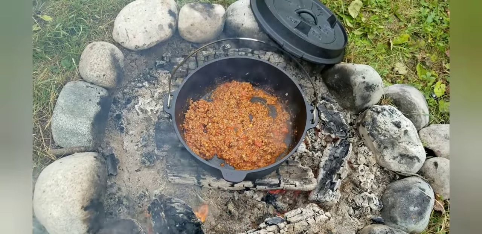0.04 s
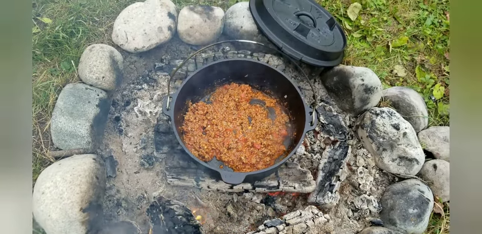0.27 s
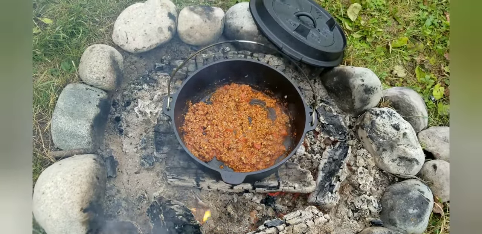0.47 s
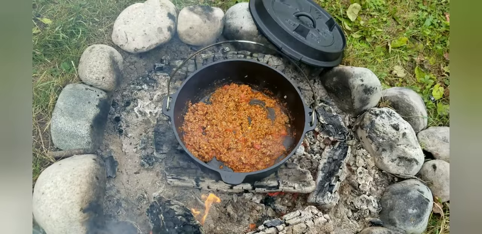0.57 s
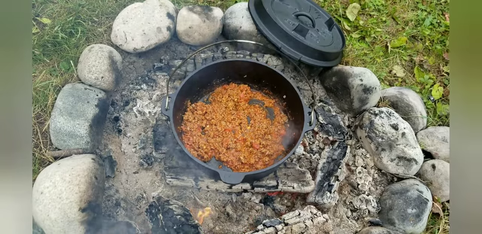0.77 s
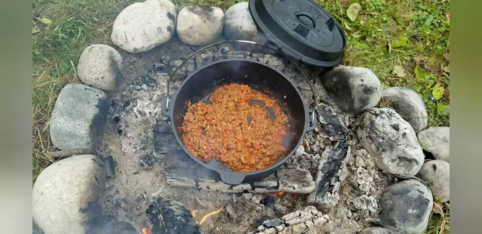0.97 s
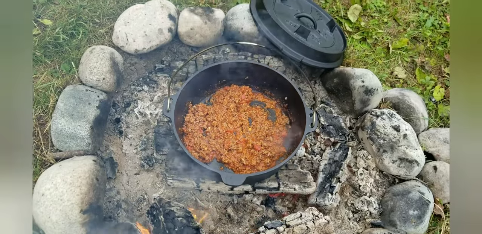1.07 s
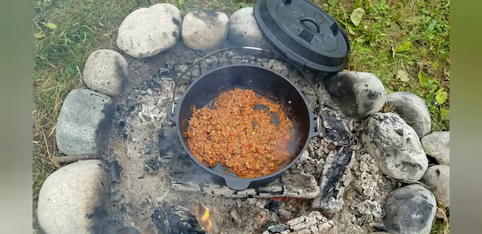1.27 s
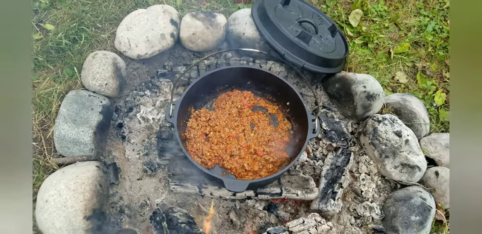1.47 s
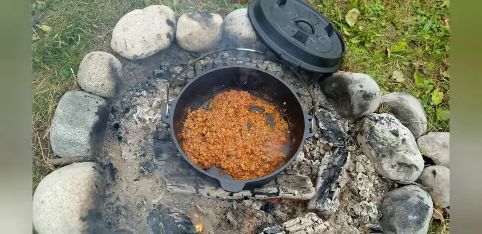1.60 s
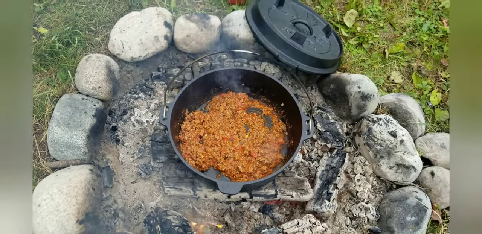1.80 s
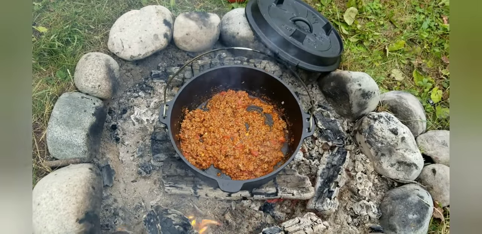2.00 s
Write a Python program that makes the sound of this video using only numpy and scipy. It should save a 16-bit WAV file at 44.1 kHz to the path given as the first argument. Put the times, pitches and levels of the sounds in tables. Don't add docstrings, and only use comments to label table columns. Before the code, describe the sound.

Meat and sauce sizzle in an iron pot, fine spitting grains over steam hiss, slightly to one side. The sizzle swells from 0.2 s, sags around 0.8-1.0 s, returns by 1.3 s and eases near the end. Embers tick from 0.2 s; wood cracks softly at 0.46 s and loudly at 0.75 s. Low flame flutter is strongest before 0.9 s; later ticks are faint, over steady outdoor wash.

```python
import sys
import numpy as np
from scipy import signal
from scipy.fft import rfft, irfft
from scipy.io import wavfile
from scipy.ndimage import uniform_filter1d

SR = 44100
rng = np.random.default_rng(int(sys.argv[2]) if len(sys.argv) > 2 else 0)


def linear_from_db(decibels):
    return 10 ** (np.asarray(decibels, float) / 20)


def inscribe(sig):
    pcm = np.round(np.clip(np.atleast_2d(sig).T, -1, 1) * 32767)
    wavfile.write(sys.argv[1], SR, pcm.astype(np.int16))


N = 90404
HISS_EDGE_HZ = 15800

# f/Hz, density/dB per Hz
WASH_COLOUR = [(300, -39), (490, -17), (545, 1), (860, -10.5), (1080, -4), (2460, -11.5), (3210, -10.5),
               (9200, -14.5), (15700, -14.5)]
# f/Hz, likeness/1
WASH_ALIKE = [(60, 0.83), (240, 0.56), (950, 0.94), (3770, 0.071), (15000, -1.3)]
# t/s, level/dB
FLUTTER_LEVEL = [(0, -58), (.12, -57.5), (.23, -65), (.27, -54), (.6, -55.5), (.72, -62), (.78, -53.5),
                 (.862, -51), (.875, -63.5), (.98, -63), (1.04, -59), (1.14, -62.5), (1.35, -61.5),
                 (1.46, -60.5), (1.56, -62), (1.64, -69), (1.8, -65), (1.93, -59), (2.05, -58)]
# f/Hz, density/dB per Hz
FLUTTER_COLOUR = [(12, -35), (30, -12.5), (74, 0.5), (290, -20.5), (317, -19.5), (400, -23), (480, -25),
                  (600, -55), (920, -120)]
# t/s, peak/dB, centre f/Hz, length/s
PUFFS = [(0.082, -49.5, 210, 0.021), (0.254, -44.5, 93.5, 0.041), (0.301, -42.5, 241, 0.057),
         (0.326, -50.5, 550, 0.047), (0.357, -45.5, 94.2, 0.012), (0.385, -61, 70.0, 0.054),
         (0.482, -41.5, 480, 0.019), (0.291, -47, 1130, 0.03), (1.464, -51, 40, 0.14),
         (1.419, -55, 66, 0.06), (1.778, -52, 68, 0.098), (0.498, -44, 68.6, 0.031),
         (0.534, -43.5, 99, 0.0313), (0.595, -45.5, 73.6, 0.025), (0.763, -41.5, 250, 0.033),
         (0.803, -41.5, 70, 0.036), (0.824, -43, 100, 0.028), (1.007, -49, 112, 0.043),
         (2.027, -51, 74.4, 0.029)]
# t/s, peak/dB, ring f/Hz, dull knock/dB, left-right/dB
TICKS = [(.2274, -35.5, 4060, -64, 6), (.3217, -28, 7300, -42, 6), (.5325, -35.5, 3600, -53, -6),
         (.6374, -27.5, 14800, -62, 2), (.7088, -31, 3700, -46, -4.5), (1.0933, -51, 5200, -60, -2),
         (1.218, -42, 7550, -63, 0), (1.325, -43, 8500, -60, -3), (1.3736, -41, 2700, -52, 1),
         (1.4017, -48, 4620, -56, -7), (1.4621, -37, 5200, -51, 4), (1.906, -42.5, 3150, -43.5, -3),
         (1.9945, -42.5, 2620, -41, -6)]
# t/s, peak/dB, ring f/Hz
SPARKS = [
    (.7083, -29, 13300),
    (.7087, -33.5, 2300),
    (1.0925, -39, 11000),
    (1.374, -38, 11000),
    (1.4017, -43, 13500),
    (.2274, -40, 2500),
    (.7482, -27, 11500),
    (.7482, -34, 14000),
    (.3217, -35, 13500),
]
# t/s, peak/dB, ring f/Hz, left-right/dB, right lag/ms
SNAPS = [(0.228, -35.5, 3200, 9, 0.43), (.298, -41.5, 594, 0, 0.44), (.308, -42, 1500, 0, 0.44),
         (.315, -43, 700, 2, .4), (0.3224, -36.5, 600, 0, 0.44), (.3228, -30, 11500, 7, .3),
         (.339, -43, 800, 2, .4), (0.4647, -35, 484, 4, 0.41), (0.4694, -41.5, 420, 1, 0.54),
         (.478, -41, 700, 5, 0.48), (.6378, -33, 13000, -1, .05), (.6378, -42, 8100, 4, .05),
         (1.3745, -40, 5460, -5, 0.054), (1.4625, -42, 2800, 2, .05), (2.0024, -46.5, 196, 1, .05),
         (0.4616, -27, 1440, 3, 0.36), (.4628, -28, 3980, 9, 0.57), (.4622, -30, 3000, 7, .45),
         (.4640, -37, 303, 2, .45), (0.465, -32, 1350, 2, 0.47), (0.4658, -31, 2120, 9, .45),
         (.478, -31, 3800, 6, 0.4), (.508, -40, 3020, 5, 0.29), (0.7095, -34, 1370, -2, .05),
         (0.7099, -33.5, 2920, -2, .05), (0.7097, -30.5, 5700, -3, 0.054), (.7099, -38, 15200, -3, 0.057),
         (.7101, -38, 8700, 7, 0.044), (0.7483, -22.5, 3700, 3, 0.54), (.7487, -26.5, 7000, 3, .45),
         (.7494, -25, 2050, -4, 0.41), (0.7497, -28, 1410, -8, .45), (0.7519, -20, 2250, 4, 0.4),
         (.7565, -27.5, 674, -2, 0.42), (.765, -32, 3900, 11, 0.38), (.768, -37, 250, 4, 0.71),
         (.788, -48, 700, 1, 0.38), (.792, -41, 208, 5, 0.23), (1.9952, -41, 845, -2, 0.062),
         (1.9954, -44, 2640, -7, .05), (1.9948, -47.5, 1700, -2, .05), (2.0018, -47, 397, -1.5, .05)]
# t/s, peak/dB, tail under crack/dB, left-right/dB, late splinter/dB
SPLITS = [
    (0.4603, -25, -3.5, 1, -11),
    (.7482, -15.5, -9, 2.5, 1),
]
# f/Hz, gain/dB
FIRST_COLOUR = [(71, -19), (120, -25), (336, -7), (1800, -2.5), (2080, -11.5), (3330, -4), (6860, -16.5),
                (9000, -21), (11700, -51), (19800, -120)]
# f/Hz, width/Hz, level/dB
FIRST_MODES = [(245, 32, 7.5), (440, 130, 1.5), (1360, 120, 4.5), (1990, 160, -0.5), (3600, 240, 3)]
# f/Hz, gain/dB
SECOND_COLOUR = [(150, -23), (480, -31), (640, -8.5), (1000, -16.5), (1700, -12), (2100, -5.5),
                 (3900, -9.5), (6000, -21), (9000, -27), (16000, -55)]
# f/Hz, width/Hz, level/dB
SECOND_MODES = [(654, 30, 5), (1370, 70, 12), (2010, 110, 4), (2290, 32, -14), (3830, 79, 11),
                (4100, 19, -17), (5080, 110, 7)]
# f/Hz, T60/s
SPLIT_TAIL = [(200, 0.22), (530, 0.25), (1390, 0.13), (3680, 0.12), (9700, 0.17)]
# t/s, level/dB, left-right/dB, top fizz/dB
FRY_LEVEL = [(0, -53, -7, 3.5), (.18, -47, -0.5, 2), (.33, -47.5, -5, 5), (.45, -45.5, -4.5, 6.5),
             (.56, -46, -5.5, 3.5), (.68, -51, -6, 1), (.8, -54, -3, 4.5), (.92, -55.5, 2, 2),
             (1.05, -50.5, -3, 3.5), (1.27, -47, -4, 2.5), (1.5, -47.5, -5.5, 2), (1.75, -47, -6, 3.5),
             (1.88, -48.5, -3.5, 3), (1.94, -51.5, -3, 2.5), (2.05, -52.5, 0, 2.5)]
# f/Hz, density/dB per Hz
FRY_COLOUR = [(400, -37), (600, -17), (767, -6.5), (1340, -4.5), (1460, -2), (1970, -4), (5560, 0.5),
              (9220, -7), (15700, -4)]


def evened(x):
    return x / np.sqrt(np.mean(x ** 2) + 1e-20)


def peaked(x):
    return x / abs(x).max()


def read(points, hz):
    f_hz, value = np.transpose(points)
    return np.interp(np.log(hz + 1), np.log(f_hz + 1), value)


def add(mix, s, sound):
    part = mix[:, round(s * SR):][:, :sound.shape[1]]
    part += sound[:, :part.shape[1]]


def panned(pan_db):
    return linear_from_db(np.array([pan_db / 2, -pan_db / 2]))


def under(x, edge_hz):
    taps = signal.firwin(1023, edge_hz, window=("kaiser", 10), fs=SR)
    return signal.oaconvolve(x, taps[None], "same")


def resonate(x, hz, width_hz):
    r = np.exp(-np.pi * width_hz / SR)
    turn = 2 * np.pi * min(hz, HISS_EDGE_HZ) / SR
    return signal.lfilter([1, 0, -1], [1, -2 * r * np.cos(turn), r * r], x)


def coloured(x, gain_db):
    cepstrum = irfft(np.log(linear_from_db(gain_db) + 1e-5))
    causal = cepstrum * np.r_[1, 2 * np.ones(1023), 1, np.zeros(1023)]
    response = irfft(np.exp(rfft(causal)))
    return signal.oaconvolve(x, response[None], axes=1)[:, :x.shape[1]]


def noise(colour, alike, patch_db, size):
    hz = np.fft.rfftfreq(size, 1 / SR)
    frames = 4 * N // size + 5
    a, b, c, d, patch = rng.standard_normal((frames, len(hz), 5)).T
    patch = uniform_filter1d(patch, size=10, axis=0)
    patch = evened(uniform_filter1d(patch, size=6, axis=1))
    same = np.clip(alike(hz), -1, 1)[:, None]
    left = a + 1j * b
    right = same * left + np.sqrt(1 - same ** 2) * (c + 1j * d)
    z = np.array([left, right]) * linear_from_db(read(colour, hz)[:, None] + patch_db * patch)
    return evened(signal.istft(z, nperseg=size, noverlap=3 * size // 4)[1][:, :N])


def wash():
    level_db = -55
    return linear_from_db(level_db) * noise(WASH_COLOUR, lambda hz: read(WASH_ALIKE, hz), 0.78, size=1024)


def flutter():
    alike, lump_db, evening = 0.87, 4, 0.41
    s, db = np.transpose(FLUTTER_LEVEL)
    rumble = noise(FLUTTER_COLOUR, lambda hz: alike + 0 * hz, lump_db, size=2048)
    power = abs(uniform_filter1d((rumble ** 2).mean(0), size=2000)) + .05
    rumble = evened(rumble / power ** (evening / 2))
    return rumble * linear_from_db(np.interp(np.arange(N) / SR, s, db))


def puff(s, db, hz, length_s):
    width_hz, rise = 0.62 * hz, 0.23
    w = rng.standard_normal((3, 6000))
    u = np.arange(6000) / SR / max(length_s, .008)
    body = resonate(w[0] + 0.2 * w[1:], hz, width_hz)
    body = resonate(body, hz, 2 * width_hz)[:, ::-1]
    body = body * np.minimum(u / rise, 1) * np.cos(np.pi / 2 * np.clip(u, 0, 1))
    return s, linear_from_db(db) * peaked(body)


def tick(s, db, hz, knock_db=-80, pan_db=-2):
    snap_t60_s, echo_db, echo_t60_s, knock_t60_s = 0.0053, -32, 0.058, 0.014
    knock_hz, knock_width_hz = 800, 1000
    t = np.arange(3000) / SR
    w = rng.standard_normal((5, len(t)))
    fall = linear_from_db(-60 * t / snap_t60_s) + linear_from_db(echo_db - 60 * t / echo_t60_s)
    fall = np.minimum(t / 0.0018, 1) ** 2 * fall
    bright = resonate((w[0] + 0.91 * w[1:3]) * fall, hz, 0.19 * hz)
    bright = resonate(bright, hz, 0.39 * hz)
    knock = (w[3] + 0.5 * w[1:3]) * np.minimum(t / 0.0009, 1) * linear_from_db(-60 * t / knock_t60_s)
    knock = resonate(knock, knock_hz, knock_width_hz)
    knock = resonate(knock, knock_hz, 2 * knock_width_hz)
    both = linear_from_db(db) * peaked(bright) + linear_from_db(knock_db) * peaked(knock)
    return s, both * panned(pan_db)[:, None]


def snap(s, db, hz, pan_db, lag_ms):
    width_hz = 460 * np.sqrt(hz / 1000)
    t = np.maximum(np.arange(2000) / SR - np.array([[0], [lag_ms / 1000]]), 0)
    fall = np.pi * width_hz * t
    ring = fall * np.exp(1 - fall) * np.sin(2 * np.pi * hz * t)
    return s, linear_from_db(db) * ring * panned(pan_db)[:, None]


def split(row, colour, modes):
    creak_s, creak_db = .012, [[-37], [-6]]
    crack_s, crack_t60_s, ring_db = .0045, 0.011, -6
    after_s, after_db, after_hz, after_t60_s = .02, -20, 2910, 0.09
    right_lag_s = .00045
    s, db, tail_db, pan_db, splinter_db = row
    t = np.arange(8192) / SR - creak_s
    w = rng.standard_normal((8, len(t)))

    creak = w[6:] * linear_from_db(splinter_db) * linear_from_db(creak_db) * np.clip(1 + t / creak_s, 0, 1) * (t < .002)
    crack_fall = linear_from_db(-60 * np.maximum(t - crack_s, 0) / crack_t60_s)
    crack = (w[0] + 0.84 * w[1:3]) * np.clip(t / 0.00099, 0, 1) ** 2 * crack_fall
    f_hz, u, z = signal.stft(w[3] + 1.9 * w[4:6], SR, nperseg=128)
    tail_t60_s = np.maximum(read(SPLIT_TAIL, f_hz), .02)[:, None]
    z = z * linear_from_db(-60 * np.maximum(u - creak_s, 0) / tail_t60_s)
    tail = signal.istft(z, SR, nperseg=128)[1][:, :len(t)]
    drive = creak + crack + linear_from_db(tail_db) * tail * np.clip(t / 0.013, 0, 1)

    ring = sum(linear_from_db(mode_db) * evened(resonate(drive, hz, width_hz)) for hz, width_hz, mode_db in modes)
    tear = coloured(drive, read(colour, np.fft.rfftfreq(2048, 1 / SR)))
    sound = evened(tear) + linear_from_db(ring_db) * evened(ring)

    late = np.maximum(t - after_s, 0)
    splinter = np.sin(2 * np.pi * after_hz * late)
    splinter = splinter * linear_from_db(after_db + splinter_db - 60 * late / after_t60_s)
    sound = peaked(sound) + splinter * linear_from_db([[0], [-8]])
    sound = np.array([sound[0], np.roll(sound[1], round(right_lag_s * SR))])
    return s - creak_s, linear_from_db(db + 3.0) * sound * panned(pan_db)[:, None]


def fry():
    spits_per_s, spread_db, alike = 3500, 4, 0.3
    steam_db, patch_db, fizz_hz = 2, 2.5, 10000
    t = np.arange(N) / SR
    s, db, pan_db, top_db = np.transpose(FRY_LEVEL)

    size = linear_from_db(spread_db * np.minimum(rng.exponential(1, (3, N)), 5))
    struck = rng.random((3, N)) < spits_per_s / SR
    spits = size * struck * rng.choice([-1., 1.], (3, N))
    spits = spits[:2] + alike * spits[2]
    spits = coloured(spits, read(FRY_COLOUR, np.fft.rfftfreq(2048, 1 / SR)))
    steam = noise(FRY_COLOUR, lambda hz: alike + 0 * hz, patch_db, size=512)
    hiss = evened(evened(spits) + linear_from_db(steam_db) * steam)

    low = under(hiss, fizz_hz)
    fizzed = low + (hiss - low) * linear_from_db(np.interp(t, s, top_db))
    return fizzed * linear_from_db(np.interp(t, s, db)) * panned(np.interp(t, s, pan_db))


def scene():
    mix = under(fry() + flutter() + wash(), HISS_EDGE_HZ)
    for row in PUFFS:
        add(mix, *puff(*row))
    for row in TICKS + SPARKS:
        add(mix, *tick(*row))
    for row, colour, modes in zip(SPLITS, (FIRST_COLOUR, SECOND_COLOUR), (FIRST_MODES, SECOND_MODES)):
        add(mix, *split(row, colour, modes))
    for row in SNAPS:
        add(mix, *snap(*row))
    return mix


def low_pass(x):
    return signal.sosfilt(signal.butter(12, 17020, fs=SR, output="sos"), x)


def record(dry):
    edge_hz = 16800
    finished = under(dry, edge_hz)
    return low_pass(finished)


dry = scene()
out = record(dry)
inscribe(out)
```